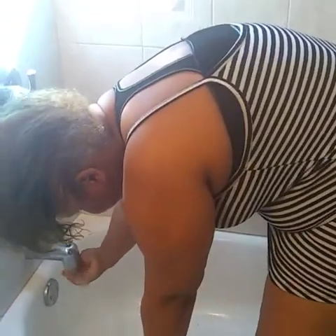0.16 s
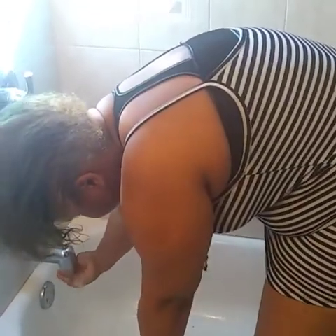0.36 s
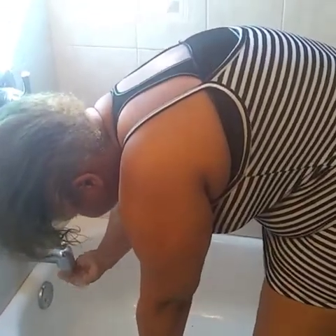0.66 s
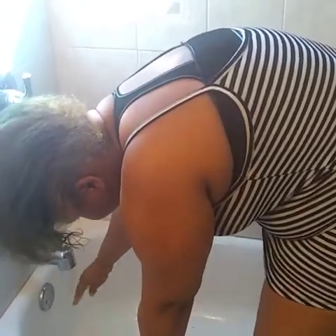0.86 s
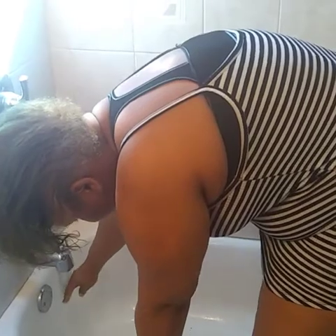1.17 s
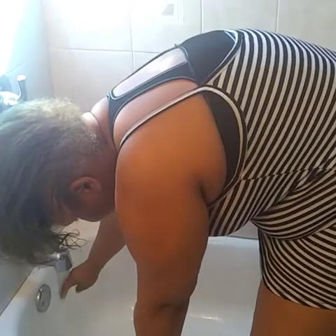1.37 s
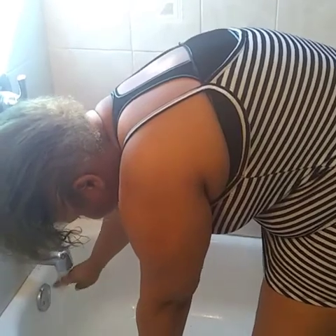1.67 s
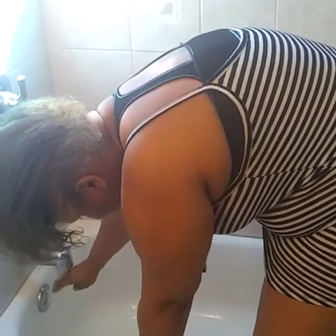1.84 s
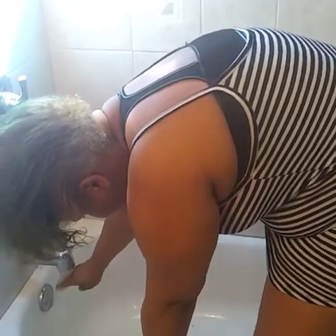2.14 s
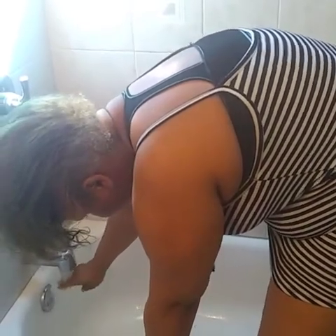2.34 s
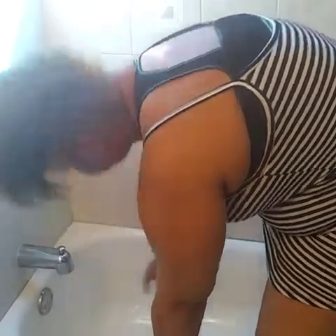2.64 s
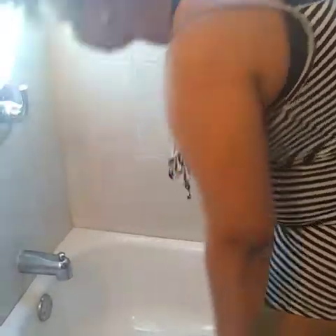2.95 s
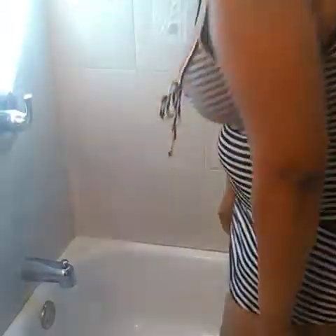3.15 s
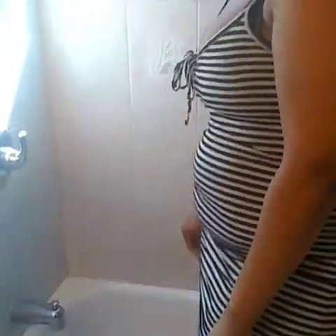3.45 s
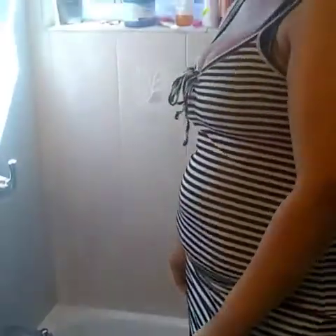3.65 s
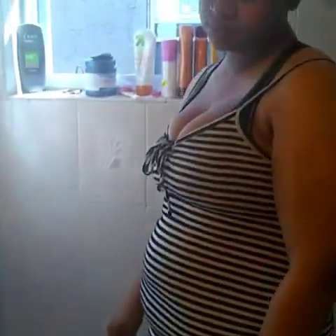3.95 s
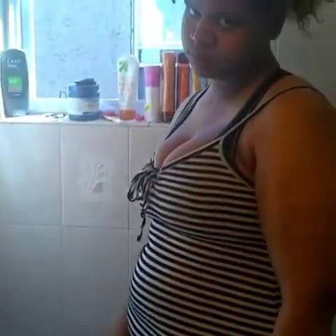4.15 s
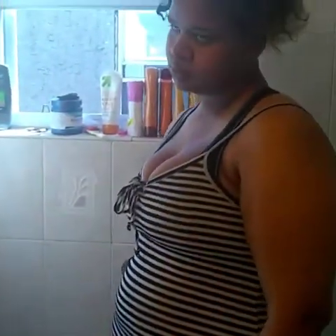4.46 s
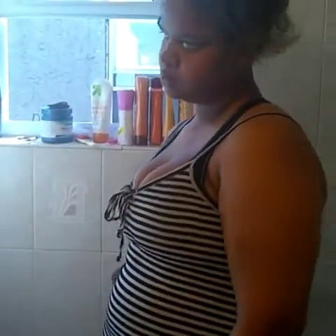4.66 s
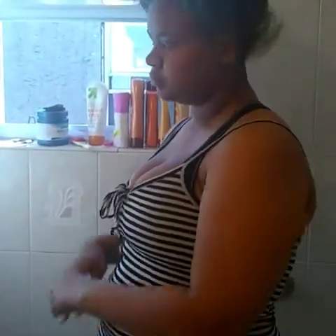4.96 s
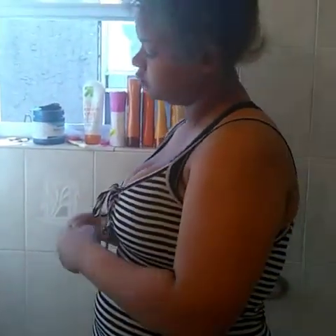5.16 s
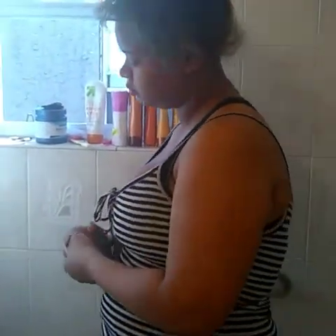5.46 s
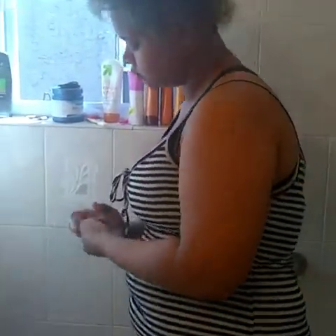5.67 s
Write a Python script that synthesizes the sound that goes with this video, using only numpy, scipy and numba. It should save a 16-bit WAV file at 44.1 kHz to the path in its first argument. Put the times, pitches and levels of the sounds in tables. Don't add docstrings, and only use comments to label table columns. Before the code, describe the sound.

A bath tap is already running in a small, hard tiled bathroom, heard close in wide stereo with a very short bright reverberation. From 0 to about 1.2 s the stream hisses and patters on the tub, broken by quick slaps and gaps as fingers pass through it, with bubbling gulps and a low, uneven drumming underneath. A fuller splash comes near 0.95 s. From 1.3 to 1.75 s the spray stutters, cutting out briefly and returning. Between about 1.8 and 2.25 s a cupped hand holds it to a dribble, leaving soft patter, gurgling and hollow tub roar. Small spurts slip out at 2.2 to 2.45 s, then the water bursts free around 2.6 s, loudest there. It eases slightly near 3.2 s and pours steadily until nearly 6 s, a dense bright spray with fluttering texture, occasional small slaps, rising bubbles and a faint low rumble.

```python
import sys
import numpy as np
from scipy import signal
from scipy.fft import rfft, irfft
from scipy.io import wavfile
from scipy.ndimage import uniform_filter1d
from numba import njit

SR = 44100
rng = np.random.default_rng(int(sys.argv[2]) if len(sys.argv) > 2 else 0)


def wav_record(signal):
    frames = np.transpose(np.atleast_2d(signal))
    bounded = np.clip(frames, -1, 1)
    quanta = np.round(bounded * 32767).astype(np.int16)
    wavfile.write(sys.argv[1], SR, quanta)


def attenuation_scalar(level_db):
    decades = np.asarray(level_db, float) / 20
    return 10 ** decades


N = 256220
HZ = np.fft.rfftfreq(N, 1 / SR) + 1e-3


def unit_rms(x):
    return x / np.sqrt(np.mean(x ** 2))


def over_hz(table):
    hz, *columns = np.transpose(table)
    return np.array([np.interp(np.log(HZ), np.log(hz), c) for c in columns])


def over_time(table):
    s, *columns = np.transpose(table)
    return np.array([np.interp(np.arange(N) / SR, s, c) for c in columns])


def bells(table, half_width_s):
    s, *columns = np.transpose(table)
    hop = 64
    t = np.arange(0, N + hop, hop) / SR
    shape = np.exp(-0.5 * ((t - s[:, None]) / half_width_s) ** 2)
    return np.repeat(np.array(columns) @ shape, hop, axis=1)[:, :N]


def walk(rate_hz):
    hold = int(SR / rate_hz)
    steps = np.repeat(rng.standard_normal(N // hold + 1), hold)
    return 0.88 * uniform_filter1d(uniform_filter1d(steps, hold), hold)[:N]


@njit
def ring(start, hz, cycles, glide, size):
    out = np.zeros(N)
    for k in range(len(start)):
        z = size[k] + 0j
        step = 2 * np.pi * hz[k] / SR
        life = cycles * SR / hz[k]
        for i in range(start[k], min(N, start[k] + int(5 * life))):
            out[i] += z.imag
            z *= np.exp(1j * step - 1 / life)
            step *= 1 + glide / life
    return out


def grains(count, low_hz, high_hz, cycles, glide, spread_db):
    when, pitch, luck = rng.random((count, 3)).T
    hz = low_hz * (high_hz / low_hz) ** pitch
    size = attenuation_scalar(-spread_db * np.log(1.003 - luck)) * hz
    return ring((when * N).astype(np.int64), hz, 1. * cycles, 1. * glide, size)


def room(x):
    t60_s, tail_db = 0.17, 0.5
    t = np.arange(N) / SR
    tails = rng.standard_normal((2, N)) * np.exp(-np.log(1000) * t / t60_s)
    tails *= attenuation_scalar(tail_db) / np.sqrt(np.sum(tails[0] ** 2))
    tails[:, 0] = 1
    return rfft(x) * rfft(tails)


def flat(spectrum):
    return spectrum / np.sqrt(uniform_filter1d(np.abs(spectrum) ** 2, size=2000) + 1e-18)


# f/Hz, likeness [0-1]
PORT_LIKENESS = [(25, .997), (60, 0.94), (250, 0.95), (600, 0.68), (900, 0), (1400, 0), (3000, 0.07)]


def ports(one, other):
    like = np.clip(over_hz(PORT_LIKENESS)[0], 0, 1)
    mid = one * np.sqrt(1 + like)
    side = other * np.sqrt(1 - like)
    return np.array([mid + side, mid - side]) / np.sqrt(2)


def rush(count, low_hz, high_hz, cycles, glide, spread_db, share):
    sources = []
    for k in range(2):
        rain = grains(count, low_hz, high_hz, cycles, glide, spread_db)
        sources.append(flat(room(rain))[k])
    blur = flat(rfft(rng.standard_normal((2, N))))
    one, other = np.sqrt(share) * np.array(sources) + np.sqrt(1 - share) * blur
    return ports(one, other)


def bands(pair, colour, flicker_db, rate_hz, coarse_db=0):
    out, before = 0, walk(rate_hz)
    for hz in 25 * 2 ** np.arange(0, 9.5, 0.5):
        window = np.cos(np.pi * np.clip(np.log2(HZ / hz), -0.5, 0.5)) ** 2
        after = walk(rate_hz)
        coarse_share = 1.02 * np.exp(-(np.log2(hz / 3200) / 0.5) ** 2)
        db = flicker_db * (before + after) + coarse_db * coarse_share
        out = out + attenuation_scalar(db) * irfft(pair * window * colour, N)
        before = after
    return out


# t/s, spray level/dB
HAND_FLOW = [(0, -29), (0.66, -28.5), (0.95, -24), (1.3, -31), (1.46, -29), (1.54, -44), (1.62, -29.5),
             (1.69, -33), (1.77, -45), (2.25, -46.5), (2.31, -37), (2.42, -36.5), (2.49, -43),
             (2.61, -32.5), (2.64, -24), (3.25, -28), (3.45, -26), (5.81, -27)]


def hand_flow_db():
    return over_time(HAND_FLOW)[0]


# t/s, spray level/dB, coarse splash level/dB
SLAPS = [(0.152, -5, 10), (0.274, 3.5, 6.5), (0.363, 1.5, 1), (0.422, -3, 3), (0.52, -2.5, 3),
         (0.562, -2.5, 13), (0.645, -2.5, -2), (0.765, -2, -1), (1.065, -2, 4), (1.376, 3, -6),
         (1.451, -0.5, 5), (1.934, 4, 2.5), (2.177, 9.5, 2.5), (2.29, 5, -5), (2.36, 3.5, 2.5),
         (2.395, -2, -1), (2.43, 4, -5), (2.537, 8, -2), (2.78, -1.5, 8), (3.109, 1.5, -2),
         (3.385, -2, 1.5), (3.42, 1.5, 0), (3.68, -1, -8), (4.55, -1.5, -2), (4.62, 1.5, 4.5),
         (4.952, 1, -4), (5.14, -0.7, 5.5), (5.549, 3, -7), (5.601, 1, 6.5), (5.698, -4, 2)]


def slaps_db():
    return bells(SLAPS, half_width_s=0.016)


# f/Hz, level/dB per Hz
SPRAY_COLOUR = [(1200, -22.5), (1800, -11), (3000, -3), (4500, 0.5), (6500, 0.5), (8500, 3), (10500, -3.5),
                (12500, -8.5), (14200, -11)]


def spray(level_db, coarse_db):
    trickle_db = -42.5
    drops = rush(count=20000, low_hz=1500, high_hz=13000, cycles=0.8, glide=0.1, spread_db=2.8, share=0.28)
    hiss = bands(drops, attenuation_scalar(over_hz(SPRAY_COLOUR)), flicker_db=1.07, rate_hz=32,
                 coarse_db=coarse_db - np.mean(coarse_db))
    flow = np.hypot(attenuation_scalar(level_db), attenuation_scalar(trickle_db))
    return unit_rms(hiss) * flow * attenuation_scalar(3.5 + 0.35 * walk(36))


# t/s, gurgle level/dB
GULP_EVENTS = [(0.093, 5.0), (0.401, 6.5), (0.485, 2), (0.841, 6.5), (0.948, 8.5), (1.082, 3.5), (1.293, 4),
               (1.472, 2.5), (1.721, 5), (2.152, 4), (2.27, 5), (2.655, 6.5), (2.821, 1.5), (3.002, 1.5),
               (3.327, 3), (3.782, 2), (4.349, 3), (4.463, 0), (5.104, 3), (5.515, 4.5)]


def gulps_db():
    return bells(GULP_EVENTS, half_width_s=0.038)[0]


# f/Hz, width/Hz, level/dB
TUB_RESONANCES = [(251, 100, 5), (404, 66, 6), (555, 48, 4.5), (680, 52, 6.5), (799, 22, 5),
                  (1128, 61, 5.5), (1462, 40, 3)]


def tub_body():
    return attenuation_scalar(sum(db / (1 + (2 * (HZ - hz) / width) ** 2) for hz, width, db in TUB_RESONANCES))


# f/Hz, level/dB per Hz
GURGLE_COLOUR = [(600, -16.5), (1000, -4), (1500, 2), (3000, -4), (6000, -11), (12000, -50)]


def gurgle(level_db):
    bubbles = rush(count=2500, low_hz=701.0, high_hz=4990, cycles=6.0, glide=0.05, spread_db=2.5, share=0.65)
    pool = bands(bubbles, attenuation_scalar(over_hz(GURGLE_COLOUR)) * tub_body(), flicker_db=1.1, rate_hz=8.8)
    return unit_rms(pool) * attenuation_scalar(level_db + 2.0)


# f/Hz, level/dB per Hz
ROAR_COLOUR = [(70, -14.5), (130, -1), (220, -1), (400, -3), (700, -8.5), (1000, -9), (1600, -23)]


def roar(level_db):
    thuds = rush(count=1500, low_hz=119.1, high_hz=1230, cycles=3.8, glide=0.041, spread_db=2.0, share=0.24)
    drumming = bands(thuds, attenuation_scalar(over_hz(ROAR_COLOUR)) * tub_body(), flicker_db=0.5, rate_hz=8)
    return unit_rms(drumming) * attenuation_scalar(level_db + 2)


# f/Hz, level/dB per Hz
THUMP_COLOUR = [(25, -10.5), (65, -3), (110, -3), (200, -13), (400, -32.5)]


def thump(level_db):
    shake = rush(count=300, low_hz=29.8, high_hz=199, cycles=1.6, glide=0.0093, spread_db=1.5, share=0.22)
    floor = bands(shake, attenuation_scalar(over_hz(THUMP_COLOUR)), flicker_db=5.0, rate_hz=8)
    return unit_rms(floor) * attenuation_scalar(0.65 * level_db - 31.5)


def scene():
    free_flow_db, coarser_db_per_db = -26, 0.17
    throb_db, throb_hz = 1.07, 75
    pool_db, pool_wander_db = -43.5, 0.15
    roar_base_db, roar_wander_db = -42.5, 1.5
    roar_per_gulp, roar_per_cupped_db = 0.27, 0.12
    drumming_until_s, drumming_db = 1.2, 6

    flow_db = hand_flow_db()
    cupped_db = uniform_filter1d(np.clip(free_flow_db - flow_db, 0, None), size=8000)
    slap_db, coarse_db = slaps_db()
    gulp_db = gulps_db()

    spray_db = flow_db + 1.17 * slap_db + throb_db * walk(throb_hz)
    gurgle_db = pool_db + 1.22 * gulp_db + pool_wander_db * walk(12)
    roar_db = roar_base_db + roar_per_gulp * gulp_db + roar_per_cupped_db * cupped_db
    roar_db = roar_db + roar_wander_db * walk(5.06)
    fingers_db = drumming_db * (np.arange(N) < drumming_until_s * SR)
    thump_db = uniform_filter1d(flow_db + fingers_db, size=8000)

    water = spray(spray_db, coarse_db + coarser_db_per_db * cupped_db)
    return water + gurgle(gurgle_db) + roar(roar_db) + thump(thump_db)


# f/Hz, level/dB
FAR_SHADE = [(2300, 0), (3400, -1.7), (4500, -2.1), (7000, -2.3), (8500, -3.6), (10500, -1.4), (13000, 1.0)]
# f/Hz, into left [0-1], into right [0-1]
STEERING = [(1100, .88, .88), (2300, .93, .93), (3400, .68, .8), (4500, .46, .72), (5600, .2, .62),
            (7000, .04, .46), (8500, .02, .36), (10500, 0, .24), (13000, 0, .1)]


def steer(dry):
    port_lag_s = 0.000446
    near, far = rfft(dry)
    far = far * attenuation_scalar(over_hz(FAR_SHADE)[0])
    lag = np.exp(-2j * np.pi * HZ * port_lag_s)
    to_left, to_right = np.clip(over_hz(STEERING), 0, 1) * lag
    return irfft(np.array([near - to_left * far, far - to_right * near]), N)


def top_cut(x):
    return signal.sosfilt(signal.butter(12, 15540, fs=SR, output="sos"), x)


def record(dry):
    mix = steer(dry)
    return top_cut(mix)


dry = scene()
out = record(dry)
wav_record(out)
```